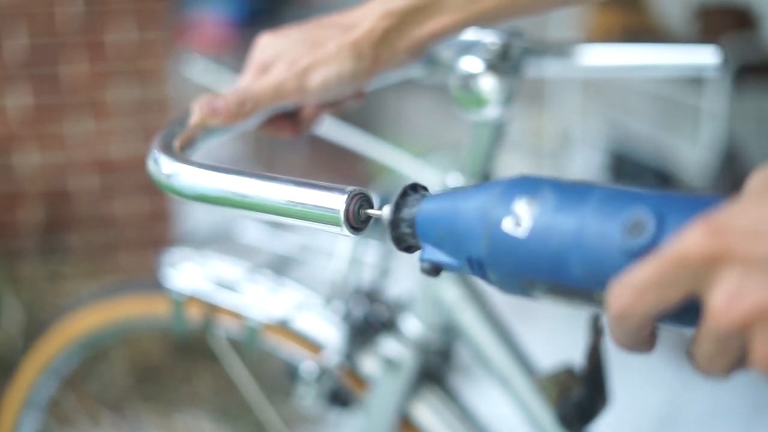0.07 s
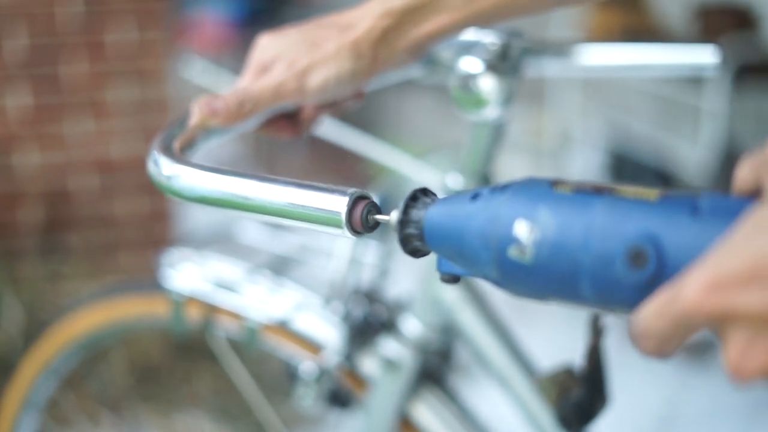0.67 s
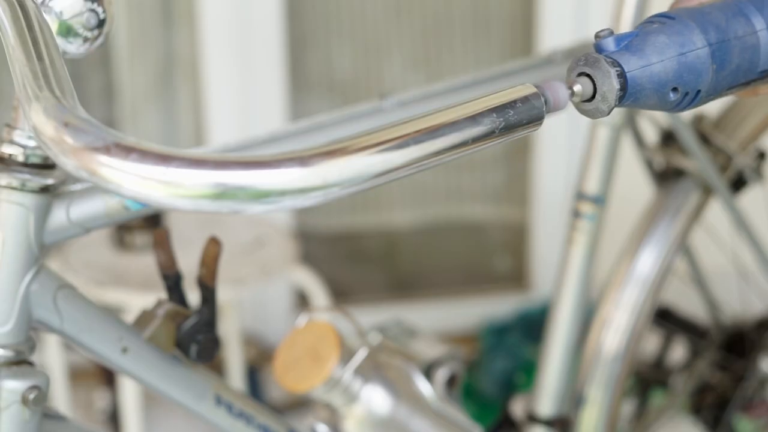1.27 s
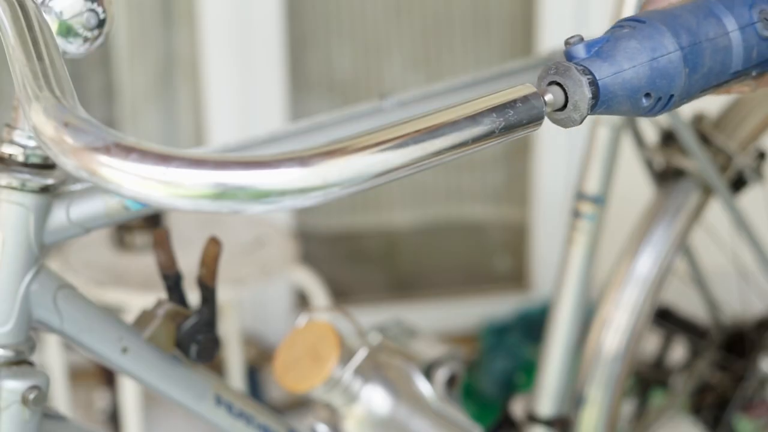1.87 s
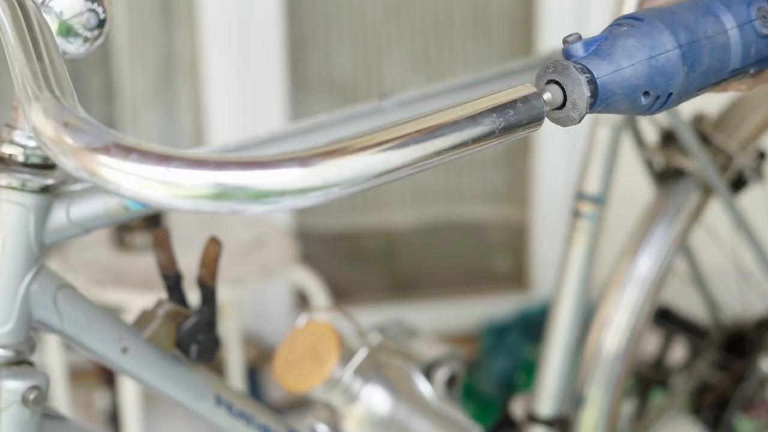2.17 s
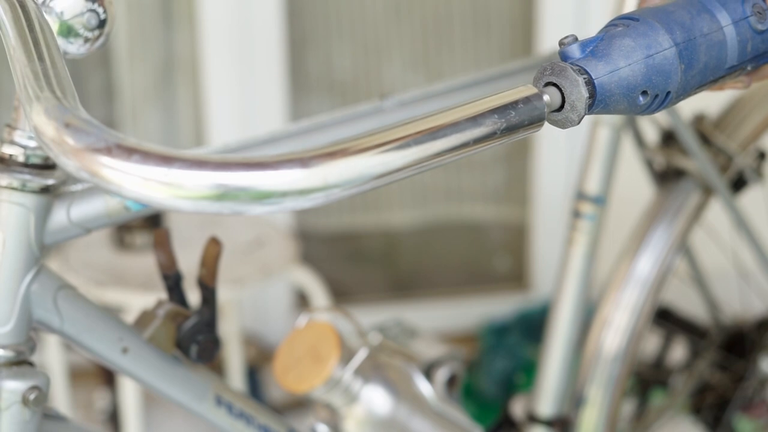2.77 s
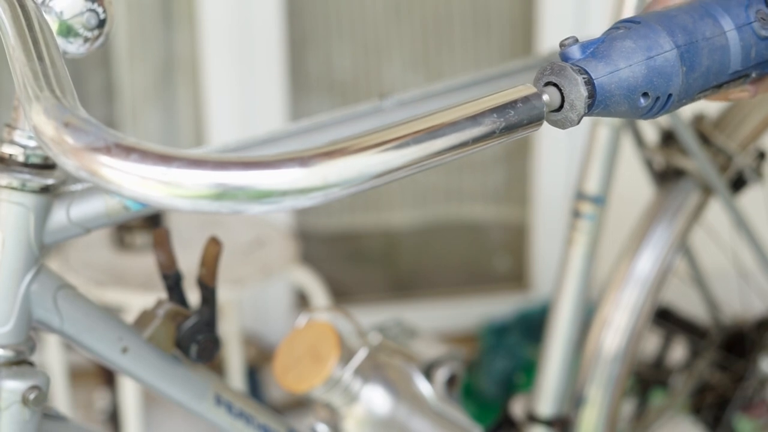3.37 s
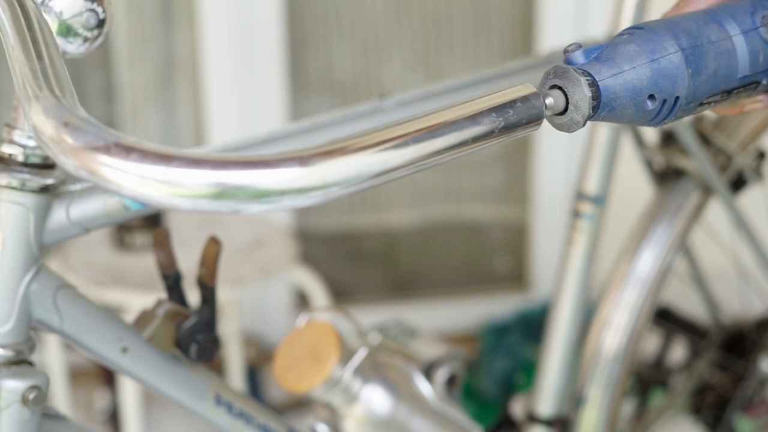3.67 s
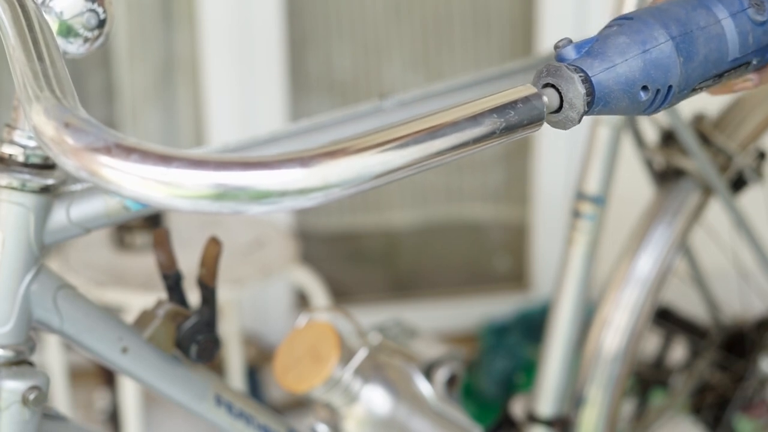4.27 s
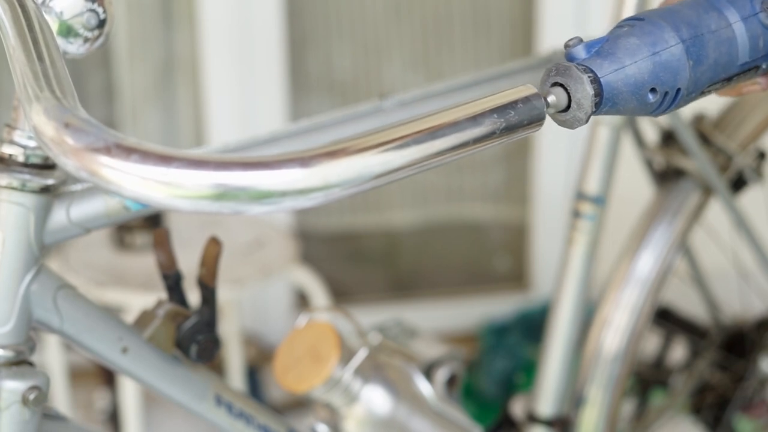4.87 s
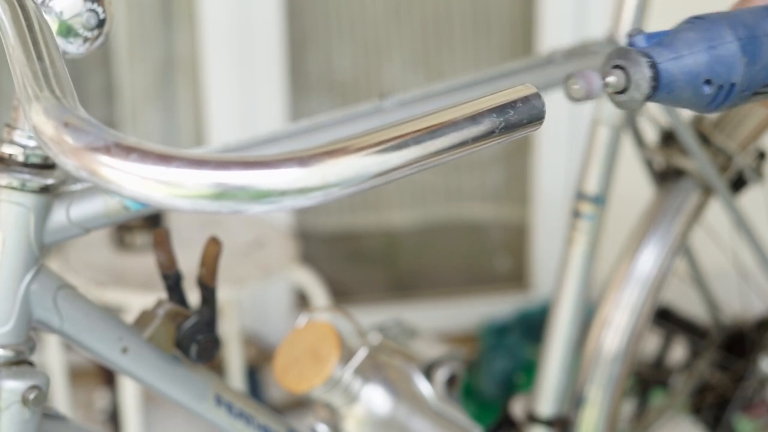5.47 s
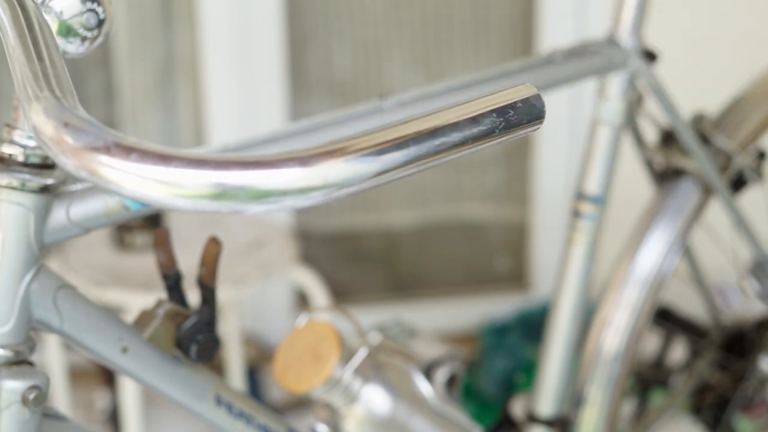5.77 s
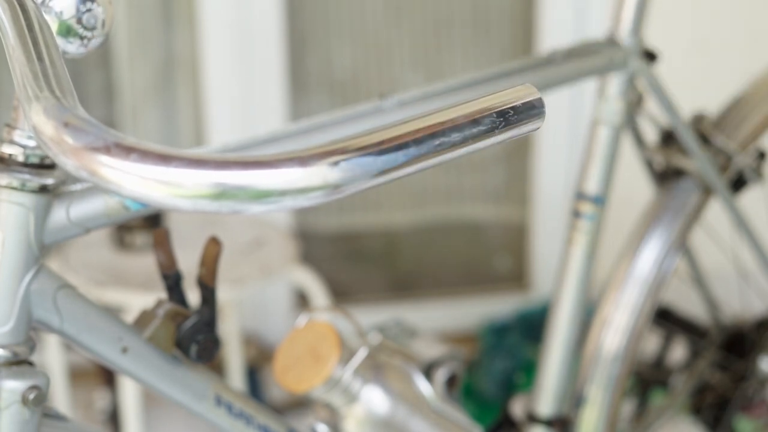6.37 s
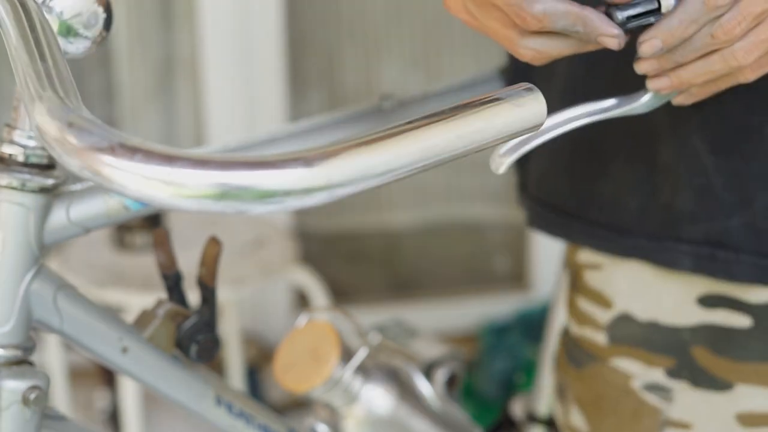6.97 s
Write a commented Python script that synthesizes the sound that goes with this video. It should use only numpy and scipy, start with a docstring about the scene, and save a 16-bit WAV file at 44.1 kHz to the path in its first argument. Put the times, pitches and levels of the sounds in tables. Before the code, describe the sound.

A small electric rotary tool grinds a steel handlebar, rasping brightly, then droning and squealing inside the tube before winding down.

```python
"""A small electric rotary tool grinds inside a steel handlebar, outdoors, close to a stereo microphone pair.
At the first tube end the stone rasps brightly on the rim and the motor sags under load. Abruptly it is deep
in the other end: the speed governor hunts, the tube drones, and friction sets its modes squealing.
Switched off, the rotor coasts down with a falling whine; hands rustle in the quiet air of the yard."""
import sys
import numpy as np
from scipy import signal
from scipy.fft import rfft, irfft, next_fast_len
from scipy.io import wavfile
from scipy.ndimage import uniform_filter1d

SR = 44100
rng = np.random.default_rng(int(sys.argv[2]) if len(sys.argv) > 2 else 0)


def materialize(psi):
    """Save the field psi as 16-bit PCM at rate SR to the path in sys.argv[1].

    A 1-D psi becomes a single channel; in a 2-D psi each row is a channel.
    """
    bounded = np.clip(np.atleast_2d(psi).T, -1, 1)
    quanta = np.round(bounded * 32767).astype(np.int16)
    wavfile.write(sys.argv[1], SR, quanta)


N = 318843
TIME = np.arange(N) / SR
SIDES = np.array([[1], [-1]])  # left, right
JUMP_S, OFF_S, REST_S = 1.266, 5.266, 6.58  # second tube end, switch-off, run-down fades out
FREE_HZ, SAG_HZ = 480, 131  # shaft speed off the rim, and its drop under full load
SET_HZ = 332.4  # the governor's aim in the second tube end

# shaft speed at the rim, sagging twice under load: t/s, f/Hz
RIM_SHAFT = [(0, 299.2), (.062, 292.3), (.174, 333.4), (.261, 455), (.31, 483), (.372, 480), (.459, 422.5),
             (.559, 359), (.64, 334.8), (.708, 282.7), (.782, 259), (.832, 277), (.857, 334), (.906, 407.5),
             (1.006, 480), (1.092, 482), (1.2, 451)]
# rasp on the rim: t/s, level/dB
RIM_RASP = [(0.0, -19), (0.276, -18.5), (0.328, -17), (0.43, -17), (0.448, -20), (0.486, -24), (0.508, -19),
            (1.158, -20), (1.172, -15), (1.26, -22.5)]
# the stone catches the rim or skips off it: t/s, half-width/s, gain/dB
RIM_BITES = [(0.079, 0.0065, 5.5), (0.214, .006, 1), (0.42, 0.016, -9.5), (0.462, 0.014, 4),
             (0.518, .008, 2), (0.608, 0.0092, 6), (0.657, 0.0038, 6), (0.692, .007, 5)]
# the governor's overshoots: top t/s, extra shaft f/Hz
OVERSHOOTS = [(1.787, 13.4), (2.163, 10.1), (2.695, 4.58), (3.071, 13), (3.495, 11.1), (3.923, 9.7),
              (4.341, 10.948), (4.785, 10.1), (5.202, 10.824)]
# how hard the stone works in the bore: t/s, grinding level/dB, hiss level/dB
BORE_EFFORT = [(1.28, -24.5, -24.5), (1.59, -21.5, -22), (2.07, -23, -25), (2.13, -22, -26.5),
               (2.23, -27, -31.5), (2.38, -24, -28), (2.41, -26.5, -31.5), (2.94, -25.5, -26.5),
               (3.06, -22.5, -26.5), (3.25, -23.5, -26.5), (3.53, -21, -26.5), (3.64, -24.5, -26),
               (4.36, -20, -24), (4.56, -22.5, -25.5), (4.67, -24.5, -30), (5.06, -24.5, -27),
               (5.2, -23.5, -26), (5.3, -26, -26.5)]

# partials of the turning shaft: multiple, level/dB
RIM_WHINE = [(2, -55), (3, -31), (4, -44), (5, -50), (6, -33.5), (7, -41), (8, -40), (9, -39), (10, -43),
             (11, -36), (12, -38), (13, -48), (14, -48), (15, -44), (16, -36), (18, -51), (20, -50),
             (21, -48), (22, -43), (23, -28.5), (24, -35), (25, -26.5)]
BORE_CHATTER = [(2, -12), (3, -10.5), (4, -6), (5, -8.5), (6, -10), (7, -9), (8, -6.5), (9, -12), (10, -13),
                (11, -45)]
BORE_WHINE = [(14, -4), (15, -5), (16, -1), (17, -5), (18, -5.5), (20, -7.5), (23, -38), (31, -6), (32, -8)]
FAN_BANDS = [(10, -21), (17, -13), (26, -18), (32, -14)]
COAST_WHINE = [(15, -10), (16, 6), (16.7, -9), (17.9, -6), (32, -15)]
COAST_HUM = [(1, -9.5), (3, 4), (4, -7), (5, -1.5), (6, -11.5), (7, -14), (8, -3.5), (9, -12), (10, 0),
             (11, -16), (12, -21), (14, -19)]

# noise spectra: f/Hz, level/dB
RIM_SPECTRUM = [(88, -70), (150, -67), (230, -28.5), (400, -27), (750, -19), (1050, -14), (1500, -17),
                (2450, -8), (3100, -9.5), (4600, -5.5), (5900, -1), (9800, -4.5), (12500, -3),
                (16000, -11.5)]
AIR_SPECTRUM = [(30, -27), (120, -9), (200, -6), (360, -5.5), (650, -10), (1700, -9), (5000, -16.5),
                (10000, -31), (16000, -38)]
BORE_SPECTRUM = [(24, -66), (50, -60), (120, -42), (260, -38), (430, -15), (560, -18.5), (750, -10),
                 (1050, -5), (1500, -7), (2700, -6.5), (3830, -11.5), (7000, -15), (11600, -20.5),
                 (16000, -34.5)]
BRUSH_SPECTRUM = [(40, -32), (180, -19), (400, -26), (600, -17), (1000, -12.5), (1230, -5.5), (1750, -11.5),
                  (2500, -2.5), (3400, -6), (8800, -9.5), (12000, -14), (16000, -27)]
HANDS_SPECTRUM = [(30, -27), (100, -9.5), (190, -7.5), (500, -12.5), (800, -17), (1100, -20), (1600, -14),
                  (2100, -18.5), (3300, -28.5), (5000, -24.5), (10000, -31), (16000, -39)]

# resonances and notches of tube and housing: f/Hz, width/Hz, gain/dB
RIM_BODY = [(800, 100, 10.5), (870, 76, -13), (1028, 44, 12), (1188, 115, -15.5), (1779, 21, 13),
            (2476, 54, 13.5), (3900, 200, 3.5), (5950, 500, 6), (6950, 520, 3.5), (7730, 300, 4.5),
            (8220, 700, 1), (9680, 790, 8), (10470, 400, 2.5)]
BORE_BODY = [(574, 7.3, 16.5), (812, 30, 6.5), (904, 55, 8), (1100, 110, -2.5), (1268, 35, 5),
             (1350, 40, 4.5), (1456, 143, -5), (1820, 33.3, 0.5), (1865, 57, 4), (2100, 180, -0.5),
             (2400, 87, 2.5), (4850, 570, 4.5), (9900, 540, 1.5)]
DRONE_BODY = [(991, 23, 7)]
HOUSING_BODY = [(3990, 1300, 4.5), (2900, 680, 9.5), (2310, 400, 7.5), (5646, 470, 16), (5100, 510, -9),
                (8900, 5450, -7)]

# four families of tube modes: f/Hz, level/dB, dB gained per dB of swell
RING = [(1960, -0.5, 1.1), (2630, 2, 0.84)]
SQUEAL = [(2866, 1, 1.13), (5010, -16.5, 1.3)]
SHRILL = [(3592, 8.5, 1.09), (4193, 0.5, 0.96), (6811, -2, 0.83)]
SCREECH = [(4990, 0, 1.06), (5770, -7, 1.1), (7200, -9, 1.2)]
# the stone sets a family going: middle t/s, length/s, level/dB, family
MODE_SWELLS = [(1.966, 0.13, -19, "squeal"), (2.034, .05, -24.5, "ring"), (2.14, 0.047, -13, "squeal"),
               (2.219, 0.11, -26, "shrill"), (2.235, 0.1, -17.5, "squeal"), (2.33, 0.19, -29, "shrill"),
               (2.359, 0.15, -18.5, "ring"), (2.425, .08, -14.5, "squeal"), (2.46, 0.041, -29, "shrill"),
               (2.5, 0.37, -26.5, "screech"), (2.506, 0.096, -13.5, "squeal"),
               (2.563, 0.055, -27, "shrill"), (2.59, 0.1, -23, "ring"), (2.612, 0.053, -19.5, "squeal"),
               (2.725, 0.072, -19, "squeal"), (3.433, 0.36, -29.5, "shrill"), (3.443, 0.045, -22.5, "ring"),
               (3.44, .07, -23, "squeal"), (3.585, 0.12, -16, "squeal"), (3.956, 0.049, -23, "ring"),
               (4.298, 0.15, -23, "ring"), (4.573, 0.042, -22.5, "ring"), (4.605, 0.058, -29.5, "shrill"),
               (4.63, 0.16, -17, "squeal"), (4.661, 0.085, -20, "ring"), (4.78, 0.044, -36, "shrill"),
               (4.884, 0.04, -21.5, "ring"), (4.937, 0.15, -33.5, "shrill"), (5.294, 0.12, -29, "squeal"),
               (5.319, .07, -33.5, "shrill")]
# simmer between squeals, by family: mean level/dB, spread/dB
MODE_SIMMER = {"ring": (-34, 4.5), "squeal": (-33.5, 3.5), "shrill": (-41, 3.5), "screech": (-43, 2)}

# swells of stone wobble, thin whistle and hands: middle t/s, length/s, level/dB
WOBBLE_SWELLS = [(2.681, 0.74, -53), (3.403, .3, -57), (4.8, 0.2, -58)]
WHISTLE_SWELLS = [(3.35, 0.14, -32), (3.79, .15, -31), (4.02, .2, -29.5), (5.155, 0.22, -40)]
RUSTLE_SWELLS = [(6.825, 0.14, -46), (7.23, .1, -52)]

# stereo width at the microphones: f/Hz, side minus mid level/dB
MIC_WIDTH = [(60, -23), (330, -23), (700, -13.5), (1290, -11), (2400, -6), (4400, -3), (9000, -3),
             (15000, -0.5)]
# balance of the pair: f/Hz, left minus right level/dB
MIC_BALANCE = [(60, -1), (110, 0.0), (200, 0.5), (380, -1), (700, 0.0), (1290, 1), (2380, -1.5), (4400, -1),
               (8120, -1.5), (15000, -0.5)]


def undb(db):
    """Decibels to gain."""
    return 10 ** (np.asarray(db) / 20)


def curves(table, t):
    """Each column of a table at the times t."""
    times, *columns = np.transpose(table)
    return [np.interp(t, times, column) for column in columns]


def gain_at(table, hz):
    """Gain of a table of f/Hz, level/dB on a log-frequency axis."""
    f, db = np.transpose(table)
    return undb(np.interp(np.log(hz + 1), np.log(f), db))


def lift(peaks, hz):
    """Gain of a set of resonances at the frequency hz."""
    return undb(sum(db / (1 + (2 * (hz - centre) / width) ** 2) for centre, width, db in peaks))


def ramp(t, start, length):
    """Rises from 0 to 1."""
    return np.clip((t - start) / length, 0, 1)


def swell(t, middle, length):
    """Rises to 1 and falls again; length lies between the half-way points."""
    return 2 ** -np.minimum(np.abs(2 * (t - middle) / length) ** 2.5, 50)


def swells(t, table, rest_db):
    """Gain of a sound that comes and goes above its resting level."""
    return undb(rest_db) + sum(undb(db) * swell(t, s, length) for s, length, db in table)


def wander(t, rate_hz):
    """Random drift with a spread near 1."""
    knots = rng.standard_normal(2 ** 12)
    return np.sqrt(3 / 2) * np.interp(t * rate_hz, np.arange(len(knots)), knots)


def tone(t, cycles, hz, rough, flutter_hz):
    """A partial fluttering in size and phase; high ones reach the two microphones out of step."""
    mid, side = (rough * (wander(t, flutter_hz) + 1j * wander(t, flutter_hz)) / np.sqrt(2)
                 for _ in range(2))
    size = 1 + mid + SIDES * gain_at(MIC_WIDTH, hz) * (1j * rng.choice([-1, 1]) + side)
    carrier = np.exp(2j * np.pi * (cycles + rng.random()))
    return np.real(size * carrier) * np.sqrt(2 / (1 + rough ** 2))


def harmonics(t, hz, orders, rough, flutter_hz, peaks=()):
    """Partials locked to the shaft; higher ones are more ragged, and each flares crossing a resonance."""
    turns = np.cumsum(hz) / SR
    return sum(undb(db) * lift(peaks, k * hz)
               * tone(t, k * turns, k * hz.mean(), rough * np.sqrt(k), flutter_hz) for k, db in orders)


def noise(colour, band_hz, peaks=(), drive=1, grain_db=0):
    """Grainy stereo noise, pulsed by drive and coloured by a body; the mid has rms 1 inside band_hz."""
    size = len(drive) if np.ndim(drive) else N
    grains = undb(grain_db * rng.standard_normal(size // 8 + 1)).repeat(8)[:size]
    padded = next_fast_len(size)
    f = np.arange(padded // 2 + 1) * SR / padded
    grit = rng.standard_normal((2, size)) * grains * drive
    mid, side = rfft(grit, padded) * gain_at(colour, f) * lift(peaks, f)
    rms = np.std(irfft(mid * (f > band_hz[0]) * (f < band_hz[1]), padded)[:size])
    return irfft(mid + SIDES * gain_at(MIC_WIDTH, f) * side, padded)[:, :size] / rms


def contact(hz, depth_db):
    """The stone is slightly out of round and presses hardest once a turn."""
    return undb(depth_db * np.cos(2 * np.pi * np.cumsum(hz) / SR))


def rim_grinding(t):
    """Close on the rim: a bright gritty rasp, and a whine that sags and weakens under load."""
    hz = uniform_filter1d(curves(RIM_SHAFT, t)[0], size=900, mode="nearest")  # rounded by rotor inertia
    free = ramp(hz, FREE_HZ - SAG_HZ, SAG_HZ)
    rasp_db, = curves(RIM_RASP, t)
    bite_db = sum(db * np.exp(-((t - s) / width) ** 2) for s, width, db in RIM_BITES)
    band_hz = (5000, 9000)
    drive = contact(hz, depth_db=1.5) * undb(1.4 * wander(t, 70.75))
    rasp = noise(RIM_SPECTRUM, band_hz, RIM_BODY, drive, grain_db=1)
    # running nearly free, the stone only skims: the middle of the rasp drops out
    skim = noise(RIM_SPECTRUM, band_hz, RIM_BODY + [(3000, 2100, -1), (1640, 250, -19)], drive, grain_db=1)
    scraping = rasp * np.sqrt(1 - free) + skim * np.sqrt(free) * undb(-0.5)
    whine = harmonics(t, hz, RIM_WHINE, rough=.14, flutter_hz=150, peaks=RIM_BODY)
    whine *= (hz / FREE_HZ) ** 1.43 * undb(wander(t, 60.8))
    return scraping * undb(rasp_db + bite_db - 1) + whine


def yard_air(t):
    """Quiet outdoor air with a faint drone far off; both come up at the jump to the second tube end."""
    air = noise(AIR_SPECTRUM, band_hz=(30, 16000)) * undb(-47.5)
    far_drone = tone(t, 198 * t, hz=198, rough=.98, flutter_hz=28.5) * undb(-62.5)
    return (air + far_drone) * (undb(-16.5) + ramp(t, JUMP_S, 0.0055))


def governed_speed(t):
    """Shaft speed in Hz: the motor climbs and hunts; once off, air drag and bearing friction slow it."""
    climb_hz, climb_s = 43.53, .062
    rise_s, fall_s = .132, .075
    drag_s, friction_hz_per_s = 2.723, 172.4
    hz = SET_HZ - climb_hz * np.exp(-np.maximum(t - JUMP_S, 0) / climb_s)
    for s, extra_hz in OVERSHOOTS:
        hz += extra_hz * np.exp(-((t - s) / np.where(t < s, rise_s, fall_s)) ** 2)
    kept = np.exp(-np.maximum(t - OFF_S, 0) / drag_s)
    return np.maximum(hz * kept - friction_hz_per_s * drag_s * (1 - kept), 20)


def mains_bursts(t, depth, decay):
    """The speed control fires the motor in a burst every half cycle of the mains; rms 1."""
    cycle = (100 * t) % 1
    burst = 1 + depth * np.exp(-cycle / decay) * (1 - np.exp(-cycle / 0.075))
    return burst / np.sqrt(np.mean(burst ** 2))


def bore_grinding(t):
    """Deep in the tube the stone rattles round the wall: hum, drone, pulsed chatter, whine, scraping."""
    hz = governed_speed(t)
    grind_db, hiss_db = curves(BORE_EFFORT, t)
    pressure_db = hiss_db + 25  # pressure on the stone goes with the grit hiss
    settling_db = -6 * (1 - ramp(t, JUMP_S, 0.17))
    hum = harmonics(t, hz, [(1, 0)], rough=.03, flutter_hz=30)
    hum *= undb(-24.5 + 1.23 * (pressure_db + settling_db))
    wobble = harmonics(t, hz, [(0.46, 0)], rough=.46, flutter_hz=24.5)
    wobble *= swells(t, WOBBLE_SWELLS, rest_db=-60.5)
    drone = harmonics(t, hz, [(3, 0)], rough=.1, flutter_hz=35, peaks=DRONE_BODY)
    drone *= undb(-26.5 + 1.42 * pressure_db)
    chatter = harmonics(t, hz, BORE_CHATTER, rough=.2, flutter_hz=45)
    chatter *= mains_bursts(t, depth=6, decay=.22) * undb(grind_db + 0.5)
    whine = harmonics(t, hz, BORE_WHINE, rough=.59, flutter_hz=60.03)
    whine *= undb(-27 - 6.4 * ramp(t, 1.38, .3))  # stands out until the stone is pressed home
    drive = contact(hz, depth_db=1) * undb(0.66 * wander(t, 60))
    scrape = noise(BORE_SPECTRUM, (1080, 1900), BORE_BODY + [(11900, 8300, -8)], drive, grain_db=0.5)
    hiss = noise(BORE_SPECTRUM, (7300, 11000), BORE_BODY + [(400, 8700, -22.5)], drive, grain_db=1)
    scraping = scrape * undb(grind_db - 3) + hiss * undb(hiss_db - 0.76)
    return hum + wobble + drone + chatter + whine + scraping


def tube_squeal(t):
    """Friction feeds the tube's own modes, which swell in turns and keep their pitch at any speed."""
    out, full_db = 0, -20
    onset_db = -5.8 * (1 - ramp(t, 1.62, .15))
    for family, modes in (("ring", RING), ("squeal", SQUEAL), ("shrill", SHRILL), ("screech", SCREECH)):
        mean_db, spread_db = MODE_SIMMER[family]
        simmer = undb(mean_db + spread_db * wander(t, 9.8) + onset_db)
        flares = [undb(db) * swell(t, s, length) for s, length, db, name in MODE_SWELLS if name == family]
        excitation = np.max([simmer] + flares, axis=0) / undb(full_db)
        for hz, db, steepness in modes:
            mode = tone(t, hz * t, hz, rough=hz / 5000, flutter_hz=hz / 45)  # higher is scratchier
            out += undb(full_db + db) * excitation ** steepness * mode
    return out


def thin_whistle(t, hz=11800):
    """A high, breathy whistle comes and goes."""
    return swells(t, WHISTLE_SWELLS, rest_db=-45) * tone(t, hz * t, hz, rough=5, flutter_hz=228)


def speed_gain(hz, db, power, knee_hz, steepness):
    """Gain of a layer that weakens as the rotor slows and dies away below knee_hz."""
    return undb(db) * (hz / SET_HZ) ** power / (1 + (knee_hz / hz) ** steepness)


def coasting(t):
    """Unpowered, the rotor slows: the hum dies first, the commutator whine, fan air and brush hiss last."""
    hz = governed_speed(t)
    brushes = noise(BRUSH_SPECTRUM, (6500, 11000), [(2970, 4100, -1.1)], contact(hz, depth_db=0.5))
    fan = harmonics(t, hz, FAN_BANDS, rough=1.5, flutter_hz=350) * (1 - ramp(t, 6.3, .2))
    whine = harmonics(t, hz, COAST_WHINE, rough=.14, flutter_hz=200, peaks=HOUSING_BODY)
    hum = harmonics(t, hz, COAST_HUM, rough=.35, flutter_hz=60,
                    peaks=[(850, 80, 4), (620, 60, 4), (480, 130, -8), (2750, 400, 3)])
    return ((brushes + fan) * speed_gain(hz, db=-27.5, power=0.47, knee_hz=42.5, steepness=3.5)
            + whine * speed_gain(hz, db=-38.5, power=0.4, knee_hz=84, steepness=7)
            + hum * speed_gain(hz, db=-28, power=2.5, knee_hz=191, steepness=15))


def hands_rustle(t):
    """Hands and clothes rustle as the tool falls silent."""
    rubbing = noise(HANDS_SPECTRUM, band_hz=(900, 8000), drive=undb(wander(t, 40)), grain_db=0.5)
    return rubbing * swells(t, RUSTLE_SWELLS, rest_db=-49) * ramp(t, 6.62, 0.081)


def scene():
    """First tube end, second tube end, then the run-down, over the air of the yard."""
    out = yard_air(TIME) + hands_rustle(TIME)
    rim = slice(0, int(1.3 * SR))
    bore = slice(int(1.2 * SR), int(5.7 * SR))
    coast = slice(int(5.2 * SR), int(6.8 * SR))
    in_bore = ramp(TIME, JUMP_S, 0.002)
    out[:, rim] += rim_grinding(TIME[rim]) * (1 - in_bore[rim])
    t = TIME[bore]
    grinding = bore_grinding(t) * (1 - ramp(t, 5.27, 0.23))
    squealing = (tube_squeal(t) + thin_whistle(t)) * (1 - ramp(t, 5.33, 0.1))
    out[:, bore] += (grinding + squealing) * in_bore[bore]
    t = TIME[coast]
    out[:, coast] += coasting(t) * ramp(t, 5.27, 0.082) * (1 - ramp(t, REST_S, 0.38))
    return out


def record(dry):
    """The close microphones differ a little in colour and the left one hears later; the top is cut."""
    left_lag_s, top_hz = 1.3e-5, 16000
    padded = next_fast_len(N)
    f = np.arange(padded // 2 + 1) * SR / padded
    balance = gain_at(MIC_BALANCE, f) ** (SIDES / 2)
    lag = np.exp(-1j * np.pi * f * left_lag_s * SIDES)
    heard = irfft(rfft(dry, padded) * balance * lag, padded)[:, :N]
    lowpass = signal.ellip(10, .2, 80, top_hz, fs=SR, output="sos")
    return signal.sosfilt(lowpass, np.clip(heard, -1, 1))


dry = scene()
out = record(dry)
materialize(out)
```